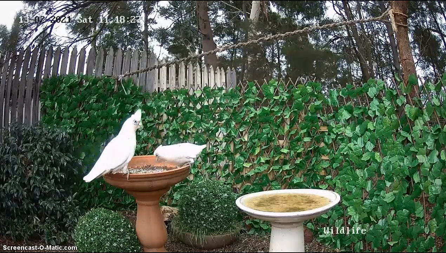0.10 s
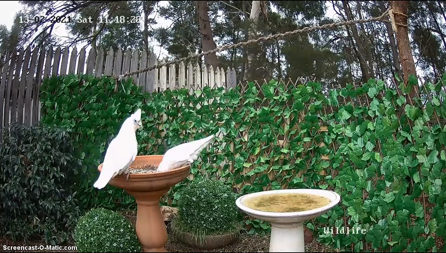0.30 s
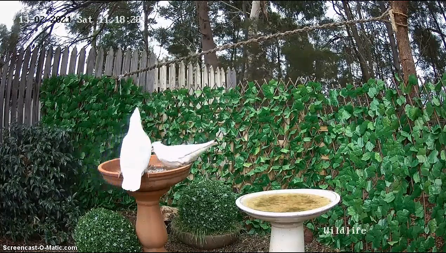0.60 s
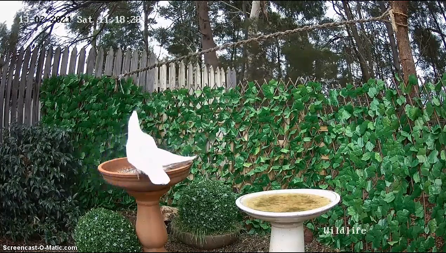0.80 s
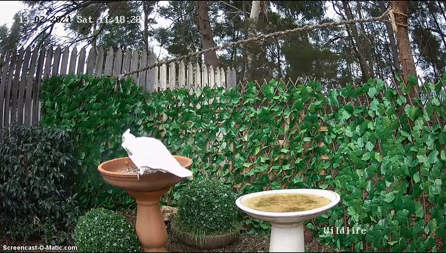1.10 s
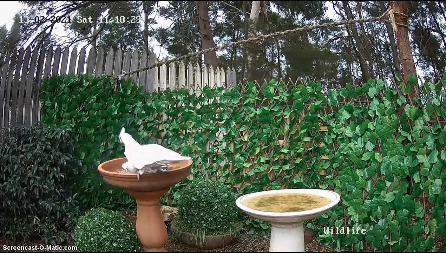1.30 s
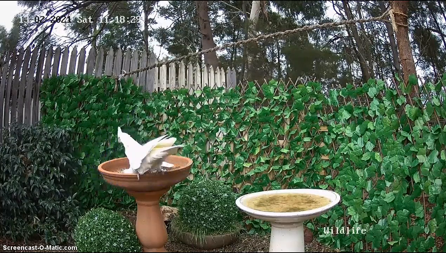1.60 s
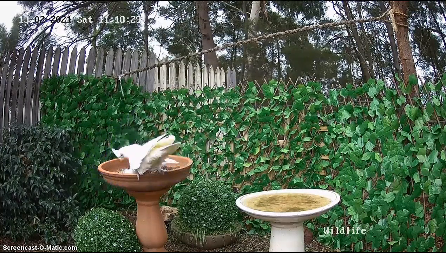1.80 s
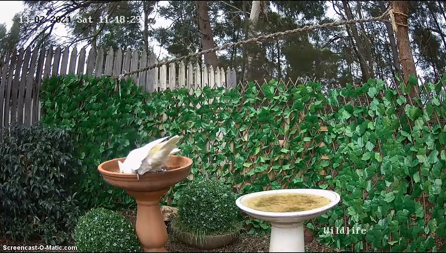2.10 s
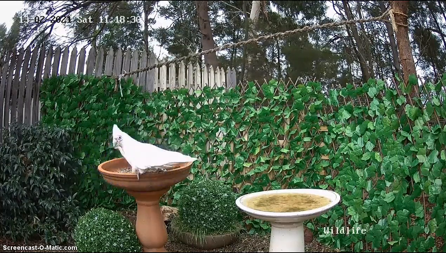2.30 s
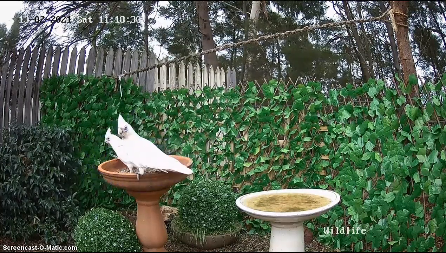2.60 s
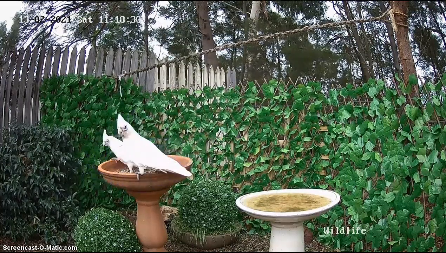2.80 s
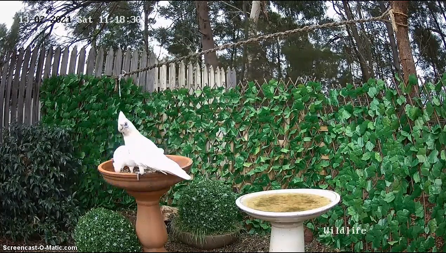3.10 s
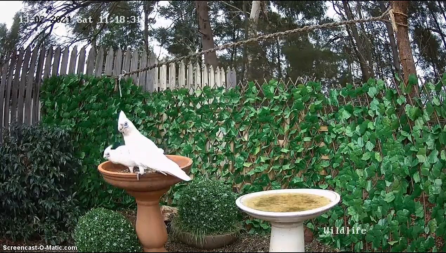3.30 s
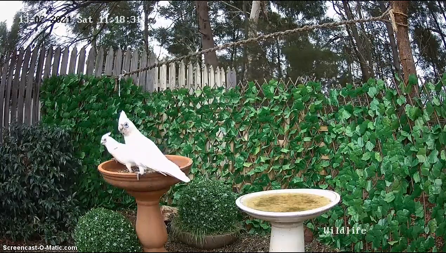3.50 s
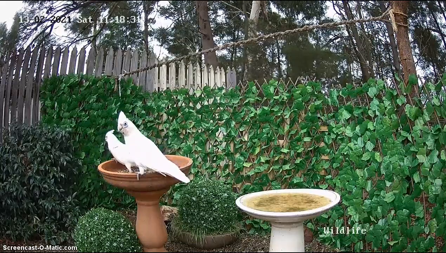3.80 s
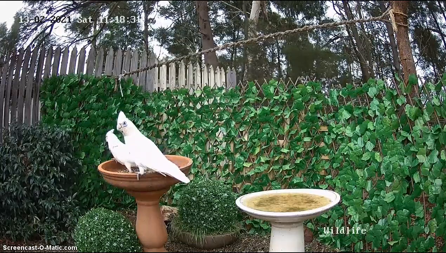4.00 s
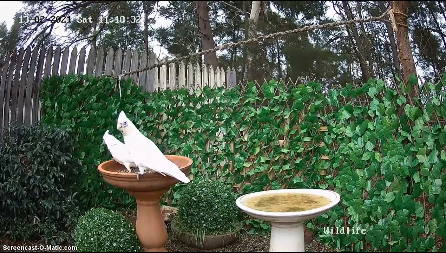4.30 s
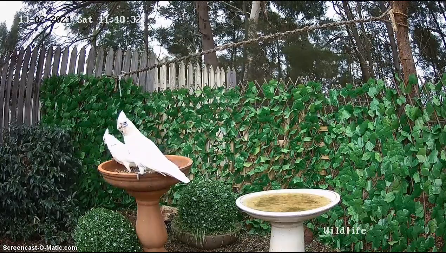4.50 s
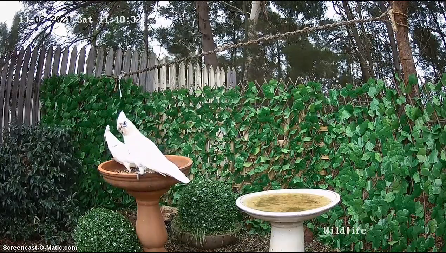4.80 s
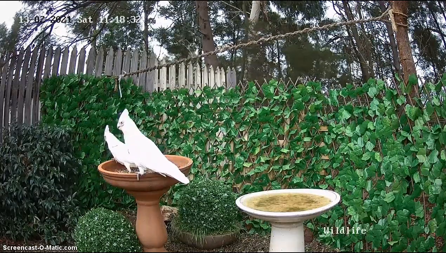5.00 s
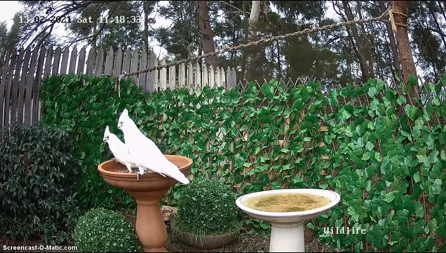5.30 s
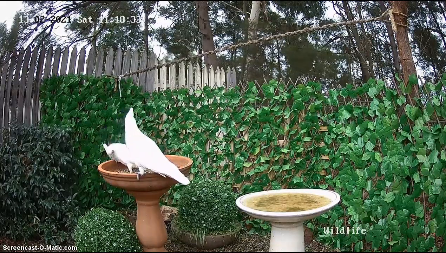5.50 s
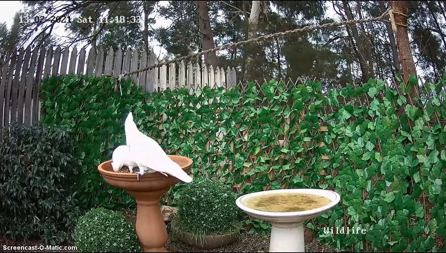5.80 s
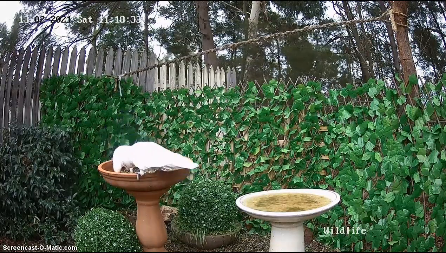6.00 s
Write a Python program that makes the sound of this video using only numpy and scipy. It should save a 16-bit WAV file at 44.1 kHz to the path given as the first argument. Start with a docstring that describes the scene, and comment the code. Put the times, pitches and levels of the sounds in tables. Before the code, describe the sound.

A cockatoo gives one loud, harsh screech in a garden, among short bird whistles, faint chirps, seed ticks and distant traffic hum.

```python
"""A garden on the edge of a town, a small camera microphone near the feeding bowl.
Close by, a white cockatoo screeches once: its syrinx swings evenly in a nasal tone, then slaps
chaotically into a rasp and ends in a squeal. Beaks tick in the seed and another bird whistles.
Small birds chirp further off in the trees; distant traffic drones over a low mains hum.
The camera hears it all through a narrow voice band and adds its own thin hiss."""
import sys
import numpy as np
from scipy import signal
from scipy.fft import rfft, irfft, next_fast_len
from scipy.io import wavfile
from scipy.ndimage import uniform_filter1d

SR = 44100
rng = np.random.default_rng(int(sys.argv[2]) if len(sys.argv) > 2 else 0)


def unload_wav(signal):
    """Save mono or channel-first audio to the path in sys.argv[1] as 16-bit WAV at rate SR, clipped to [-1, 1]."""
    wavfile.write(
        sys.argv[1],
        SR,
        np.round(np.clip(np.atleast_2d(signal).T, -1, 1) * 32767).astype(np.int16),
    )


N = 272979
TIME = np.arange(N) / SR
FFT_SIZE = next_fast_len(N + SR, real=True)
FREQ = np.arange(FFT_SIZE // 2 + 1) * SR / FFT_SIZE

# the screech, close to the microphone: t/s, f/Hz, level/dB, rasp over clean tone/dB
SCREECH_COURSE = [(2.066, 746, -48.5, 15.5), (2.087, 754.8, -37, 9), (2.11, 796.7, -30.5, 2),
                  (2.124, 794.2, -27, -12.5), (2.141, 794.4, -28.5, -16), (2.155, 780.6, -24, -13.5),
                  (2.188, 777.2, -21.5, -17.5), (2.212, 780.9, -24.2, -0.5), (2.265, 783, -25.5, 11.5),
                  (2.52, 782.2, -25.5, 13.5), (2.61, 774.5, -28.3, 28), (2.666, 768, -40, 30),
                  (2.697, 764, -66, 30)]
# harmonics of its clean tone, first to fifth: relative level/dB
NASAL_HARMONICS = [-7, -6.5, -0.5, -6.5, -7]
# throat resonances that colour the rasp: f/Hz, width/Hz, relative level/dB
THROAT_RESONANCES = [(330, 210, -20.5), (741, 74, -13), (1095, 25, -15.5), (1329, 40, -14.5),
                     (1605, 95, -13.5), (1806, 42, -14.5), (2333, 84, -6), (2593, 55, -9), (2913, 43, -9),
                     (3083, 65, -7), (3440, 30, -3), (3560, 80, -7), (3730, 45, -10), (3900, 35, -8),
                     (4150, 250, -13.5)]


def cockatoo(jitter=.0043, chaos=.3, scatter_db=3, flutter_db=.7, full_tone_s=2.147, thin_db=-10.5):
    """At the bowl: the syrinx swings evenly at first, then slaps chaotically and rings the throat."""
    gate, hz, level_db, rasp_db = controls(SCREECH_COURSE)
    rough = 1 / (1 + undb(-rasp_db))
    # the fundamental starts weak
    early = uniform_filter1d(1. * (TIME < full_tone_s), size=480)
    partials_db = [NASAL_HARMONICS[0] + thin_db * early, *NASAL_HARMONICS[1:]]
    # the tone stumbles as the rasp takes over
    clean = tone(hz * (1 + (jitter + .017 * rough) * walk(147)), partials_db)
    clean *= undb(4.6 * rough * (walk(70) - .3))
    cycles = np.floor(np.cumsum(hz * np.exp(chaos * walk(600))) / SR)
    slaps = np.diff(cycles, prepend=0) * undb(scatter_db * walk(550))
    slaps = unit(shape(slaps - slaps.mean(), 1 - .6 * bell(780, 220)))
    # uneven slaps and the air they let through drive the same resonances
    air = .66 * rng.standard_normal(N)
    peak_power = sum((undb(db) * bell(f, width)) ** 2 for f, width, db in THROAT_RESONANCES)
    throat = np.sqrt(peak_power + (undb(-25.5) * bell(2700, 1300)) ** 2)
    rasp = unit(shape(slaps + air, throat))
    # steady air pressure holds the strength of the rasp, which only flutters
    rasp /= np.sqrt(uniform_filter1d(rasp ** 2, size=700))
    rasp *= unit(undb(flutter_db * walk(130)))
    voice = ((1 - rough) * clean + rough * rasp) / np.hypot(1 - rough, rough)
    return gate * undb(level_db) * voice


def cockatoo_shrill(start_s=2.22, length_s=.3523, hz=3580, level_db=-29, jitter=.0095, flutter_db=2):
    """The other side of the syrinx holds a high unsteady tone through the rasp."""
    gain = undb(level_db) * envelope(start_s, length_s, attack_s=.037, release_s=.09)
    flutter = unit(undb(flutter_db * walk(110)))
    pitch = arc(start_s, length_s, hz, glide_hz=-10, arch_hz=10.5)
    return note(gain * flutter, pitch * (1 + jitter * walk(190)))


# the squeal that ends the screech and drops to a croak: t/s, f/Hz, level/dB
SQUEAL_COURSE = [(2.588, 1335, -38), (2.62, 1401, -37), (2.642, 1682, -38.5), (2.664, 1301, -38.5),
                 (2.685, 1155, -51.5), (2.714, 800, -51), (2.727, 490, -56), (2.742, 465, -44),
                 (2.78, 450, -52)]


def cockatoo_squeal(waver=.007, hoarse_waver=.05, hoarse_below_hz=1200):
    """The screech ends in a clear upturn, which grows hoarse as its pitch collapses."""
    gate, hz, db = controls(SQUEAL_COURSE)
    hoarse = uniform_filter1d(1. * (hz < hoarse_below_hz), size=600)
    tremble = 1 + (waver + hoarse_waver * hoarse) * walk(240)
    return note(gate * undb(db), hz * tremble, overtone_db=-20)


# soft nasal notes: t/s, length/s, f/Hz, glide/Hz, arch/Hz, flick/Hz, level/dB, swell/dB, overtone/dB
NASAL_NOTES = [(-.045, 0.14, 1429, -80, 104, 524, -44, 2, -11),
               (.566, .134, 1423, -1, 100, 230, -40.5, -3, -17),
               (2.839, .114, 1460, 40.5, 15, 259, -48.5, 9, -5.5),
               (5.574, 0.14, 1443, 20, 64, 170, -43, -2, -14)]
# the short note after each: t/s, length/s, f/Hz, glide/Hz, arch/Hz, level/dB, overtone/dB
ANSWER_NOTES = [(.107, 0.057, 1616, 40, 70, -35, -11.5), (.724, 0.045, 1528, -120, 21, -30, -29.5),
                (2.981, 0.039, 1638, 47, 3, -36.5, -14), (5.729, .048, 1553, -120, 30, -35, -30)]


def whistler(waver=.0073, flutter_db=.9, overtone_flutter_db=4.2, flick_s=.0253):
    """A bird nearby: a nasal note that flicks upward, then a short purer one; overtones come and go."""
    tremble = 1 + waver * walk(200)
    nasal_db = overtone_flutter_db * walk(65) - 1.5
    out = 0
    for start, length, hz, glide, arch, flick, db, swell_db, overtone_db in NASAL_NOTES:
        upturn = np.clip((TIME - start - length) / flick_s + 1, 0, 1)
        pitch = arc(start, length, hz, glide, arch) + flick * upturn
        gain = envelope(start, length, attack_s=.0082, release_s=.01)
        gain *= undb(db + swell_db * progress(start, length) / 2)
        out += note(gain, pitch * tremble, overtone_db + nasal_db - 5 * upturn, third_db=1)
    for start, length, hz, glide, arch, db, overtone_db in ANSWER_NOTES:
        gain = envelope(start, length, attack_s=.006, release_s=.017) * undb(db)
        out += note(gain, arc(start, length, hz, glide, arch) * tremble, overtone_db + nasal_db)
    return out * undb(flutter_db * walk(70))


# beaks on seed and bowl, close by: t/s, level/dB
SEED_CRACKS = [(.062, -46), (.759, -53), (.843, -51.5), (.854, -57), (1.026, -56), (2.994, -45),
               (3.026, -53), (3.385, -53), (3.836, -45), (4.127, -52), (5.174, -47), (5.461, -47),
               (5.475, -53), (5.8, -51.5)]
# their spectrum: f/Hz, relative level/dB
CRACK_SPECTRUM = [(300, -13), (1300, -3), (2200, 12.5), (3000, 10.5), (3800, 22), (4500, -15.5)]


def beaks(decay_s=.0036, rattle_s=.022, rattle_db=-11, nibble_db=-63, nibble_count=26):
    """Each crack of a seed is a sharp burst and a short rattle of husks; faint nibbles fall between."""
    nibbles = [(u * N / SR, nibble_db + 6 * v) for u, v in rng.random((nibble_count, 2))]
    age = TIME[:SR // 10]
    crack = np.exp(-age / decay_s) + undb(rattle_db) * np.exp(-age / rattle_s)
    bursts = np.zeros(2 * N)
    for s, db in list(SEED_CRACKS) + nibbles:
        start = int(s * SR)
        bursts[start:start + len(crack)] += undb(db) * crack
    return bursts[:N] * noise(colour(CRACK_SPECTRUM))


# high chirps in the trees: t/s, length/s, f/Hz, glide/Hz, arch/Hz, level/dB
TREE_CHIRPS = [(.502, 0.023, 3460, 0, 0, -59.5), (1.324, 0.025, 3440, 0, -60, -44.5),
               (1.468, 0.026, 3020, 80, 0, -48), (1.551, 0.015, 3700, -200, 0, -48.5),
               (1.566, 0.017, 3510, 2400, 200, -41.5), (1.587, .03, 3980, -550, 379, -30.5),
               (1.614, .022, 3420, 250, 350, -33), (1.635, .027, 2840, -900, 120, -38.5),
               (4.52, 0.027, 2700, -120, 0, -60), (4.847, 0.024, 2480, -480, 2, -56),
               (4.871, .025, 2600, -120, 0, -52), (5.227, 0.021, 2490, -480, 0, -56),
               (5.25, 0.024, 2450, -480, 0, -54), (5.27, 0.027, 2620, -200, -50, -51)]
# far slurred calls, timed by their drop in pitch: t/s, length before/s, length after/s, level/dB
FAR_SLURS = [(5.028, 0.0682, .037, -51), (5.436, .075, .08, -53), (6.137, .01, .08, -51.5)]


def small_birds(waver=.02, flutter_db=2.5, near_db=-35, echo_growth=.6, blur=.8):
    """Buzzy squeaks thickened by the leaves; the fainter ones are further off and have more echo."""
    tremble = 1 + waver * walk(450)
    flutter = unit(undb(flutter_db * walk(200)))
    calls = []
    for start, length, hz, glide, arch, db in TREE_CHIRPS + chatter():
        gain = envelope(start, length, attack_s=.008, release_s=.011)
        calls.append((db, gain, arc(start, length, hz, glide, arch)))
    calls += [(db, *slur(drop, before, after)) for drop, before, after, db in FAR_SLURS]
    direct, scattered = 0, 0
    for db, gain, hz in calls:
        call = undb(db) * note(gain, hz * tremble) * flutter
        direct += call
        scattered += call * undb(echo_growth * (near_db - db))
    leaves = garden_echo(direct, wet_db=-8.5, t60=.08, gap_s=.003)
    # the long echo is blurred in pitch
    trees = garden_echo(scattered * (1 + blur * walk(600)), wet_db=-21, t60=.8, ring=1)
    return undb(-1) * direct + leaves + trees


def slur(drop, before, after, high_hz=3410, low_hz=2200, sag_hz_per_s2=85000, drop_s=.013, low_db=-2.5):
    """Gain and pitch of a far call that sags to a held note, then falls to a softer low register."""
    high = np.exp(-np.clip(TIME - drop, 0, 1) / drop_s)
    upper_hz = high_hz + sag_hz_per_s2 * np.maximum(drop - TIME, 0) ** 2
    gain = envelope(drop - before, before + after, attack_s=.076, release_s=.025)
    return gain * undb(low_db * (1 - high)), high * upper_hz + (1 - high) * low_hz


def chatter(count=16, length_s=.02, low_hz=2600, high_hz=3900.5, glide_hz=-300, level_db=-66.5):
    """Rows of faint chirps deep in the trees, at chance times and pitches."""
    return [(u * N / SR, length_s, low_hz + v * (high_hz - low_hz), glide_hz, 0, level_db)
            for u, v in rng.random((count, 2))]


# bands that linger in the echo from the trees: f/Hz, width/Hz, lift/dB
LINGERING_BANDS = [(3000, 100, 7), (3460, 130, 8.5), (3900, 200, 2.5)]


def garden_echo(x, wet_db, t60, gap_s=.011, ring=0):
    """Fence, hedge and trees scatter a thin tail back to the microphone."""
    tail = rng.standard_normal(N) * undb(-60 * TIME / t60) * (TIME > gap_s)
    tail /= np.sqrt(np.sum(tail ** 2))
    lift = undb(ring * sum(db * bell(f, width) for f, width, db in LINGERING_BANDS))
    return undb(wet_db) * shape(x, lift * rfft(tail, FFT_SIZE))


# the distant town as heard from the garden: f/Hz, relative level/dB
TOWN_SPECTRUM = [(12, -44), (20, -1.5), (90, -5), (123, 2), (147, -5.5), (201, -2.5), (240, -10),
                 (306, -7.5), (426, -13), (466, -14), (532, -16), (621, -12), (1650, -22), (2060, -29.5),
                 (4000, -26), (5200, -62), (8800, -120)]
# its droning resonances: f/Hz, width/Hz, lift/dB
TOWN_DRONES = [(206.7, 10, 5), (471, 11.6, 9), (609.3, 10, 7), (767, 27, 4.5), (1714, 81, 7.5),
               (3000, 42, 4.5), (3540, 180, 0)]
# how it swells: t/s, mains hum level/dB, rumble level/dB, wash level before its lift/dB
TOWN_COURSE = [(0, -54.5, -50, -57), (1.0, -54, -51, -58.5), (1.7, -56.5, -52, -59),
               (2.4, -57.5, -52, -58.5), (3.4, -58.5, -51.5, -57), (4.4, -59.5, -50.5, -55.5),
               (5, -57.5, -51, -55.5), (6.19, -58.5, -49.5, -55.5)]


def town(mains_hum_hz=120, split_hz=400, wash_lift_db=1):
    """Distant traffic, a low rumble and a higher wash, drones and swells over a wavering mains hum."""
    _, hum_db, rumble_db, wash_db = controls(TOWN_COURSE)
    drones = undb(sum(db * bell(f, width) for f, width, db in TOWN_DRONES))
    spectrum = colour(TOWN_SPECTRUM) * drones
    bass = 1 / np.sqrt(1 + (FREQ / split_hz) ** 8)
    treble = np.sqrt(1 - bass ** 2)
    rumble = noise(spectrum * bass) * undb(rumble_db + .64 * walk(8))
    wash = noise(spectrum * treble) * undb(wash_db + wash_lift_db + .5 * walk(3.5))
    hum = tone(mains_hum_hz * (1 + .011 * walk(5.7))) * undb(hum_db + 1.8 * walk(9))
    return rumble + wash + hum


def far_rush():
    """Far off, a soft band of noise comes and goes once."""
    return noise(bell(hz=1780, width=300)) * swell(peak_s=5, half_s=.24, db=-62.5)


# the camera's own hiss: f/Hz, relative level/dB
HISS_SPECTRUM = [(200, 5.5), (5000, -2), (7500, -4.5), (10000, -6), (12500, -7), (15500, -9)]
# soft swells at the top of the hiss: t/s, half length/s, level/dB
TREBLE_SWELLS = [(1.648, .1, -68.5), (2.04, 0.09, -66), (2.48, 0.17, -66), (2.934, .05, -65),
                 (3.16, .06, -68.5), (3.41, .052, -64.5), (3.68, .05, -70.5), (3.883, .04, -66),
                 (4.12, .06, -65.5), (4.498, .18, -66.5)]


def camera_hiss(level_db=-64, top_hz=9750, lower_hz=6000, width_hz=2200):
    """Thin steady hiss whose treble swells now and then; one swell reaches lower."""
    top_gain = np.sqrt(sum(swell(*row) ** 2 for row in TREBLE_SWELLS))
    top = top_gain * noise(bell(top_hz, width_hz))
    steady = undb(level_db) * noise(colour(HISS_SPECTRUM))
    lower = swell(peak_s=4.5, half_s=.11, db=-65.5) * noise(bell(lower_hz, width_hz))
    return steady + top + lower


def tone(hz, partials_db=(0,)):
    """Harmonics on a moving pitch, at rms 1."""
    phase = 2 * np.pi * np.cumsum(hz) / SR
    return unit(sum(undb(db) * np.sin(k * phase) for k, db in enumerate(partials_db, 1)))


def note(gain, hz, overtone_db=-100, third_db=-9):
    """A gliding note; overtone_db sets its second harmonic, third_db the third against the second."""
    on = gain > 1e-6
    phase = 2 * np.pi * np.cumsum(hz[on]) / SR
    overtone_gain = undb(np.broadcast_to(overtone_db, N)[on])
    overtones = overtone_gain * (np.sin(2 * phase) + undb(third_db) * np.sin(3 * phase))
    out = np.zeros(N)
    out[on] = np.sqrt(2) * gain[on] * (np.sin(phase) + overtones)
    return out


def controls(rows):
    """A gate open from the first row's time to the last, then each further column at every sample."""
    s, *columns = np.transpose(rows)
    gate = uniform_filter1d(1. * ((TIME >= s[0]) & (TIME <= s[-1])), size=128)
    return [gate] + [np.interp(TIME, s, column) for column in columns]


def envelope(start, length, attack_s, release_s):
    """Attack, hold and release."""
    return np.clip((TIME - start) / attack_s, 0, 1) * np.clip((start + length - TIME) / release_s, 0, 1)


def progress(start, length):
    """Runs from -1 to 1 in the course of a note."""
    return np.clip(2 * (TIME - start) / length - 1, -1, 1)


def arc(start, length, hz, glide_hz, arch_hz):
    """The pitch of a note glides and arches over its middle."""
    u = progress(start, length)
    return hz + glide_hz * u / 2 - arch_hz * u ** 2


def swell(peak_s, half_s, db):
    """A smooth rise and fall of gain."""
    return undb(db) * np.exp(-((TIME - peak_s) / half_s) ** 2 / 2)


def noise(gain):
    """Coloured noise of rms 1."""
    return unit(shape(rng.standard_normal(N), gain))


def walk(rate_hz):
    """Smooth random wander of spread 1."""
    return noise(np.exp(-(FREQ / rate_hz) ** 2))


def shape(x, gain):
    """Filter by a gain for each frequency."""
    return irfft(rfft(x, FFT_SIZE) * gain, FFT_SIZE)[:N]


def colour(points):
    """Gain for each frequency from points of f/Hz, level/dB."""
    hz, db = np.transpose(points)
    return undb(np.interp(np.log(FREQ + 1), np.log(hz), db))


def bell(hz, width):
    """A resonance applied twice, for steep flanks."""
    return 1 / (1 + ((FREQ - hz) / width) ** 2)


def undb(db):
    """Decibels to gain."""
    return 10 ** (np.asarray(db) / 20)


def unit(x):
    """Scale to rms 1."""
    return x / np.sqrt(np.mean(x ** 2))


def scene():
    """What reaches the microphone: near birds at the bowl, small ones in the trees, the town beyond."""
    bowl = cockatoo() + cockatoo_shrill() + cockatoo_squeal() + beaks()
    whistles = whistler()
    bowl += garden_echo(bowl, wet_db=-15.5, t60=.68)
    whistles += garden_echo(whistles, wet_db=-21.5, t60=.56)
    return (bowl + whistles + small_birds() + town() + far_rush())[None]


# upper edge of the camera's voice band: f/Hz, level/dB
VOICE_BAND_EDGE = [(3650, 0), (4000, -4), (4300, -13), (4450, -27), (4600, -62), (5000, -100)]


def record(dry, sampling_hz=8000, top_hz=15750):
    """Mono camera microphone: slow sampling mirrors sound about the band's edge; hiss lies on top."""
    band = colour(VOICE_BAND_EDGE)
    mirrored = shape(dry[0], band) * (1 + 2 * np.cos(2 * np.pi * sampling_hz * TIME))
    with_hiss = shape(mirrored, band) + camera_hiss()
    lowpass = signal.ellip(10, .2, 70, top_hz, fs=SR, output="sos")
    return signal.sosfilt(lowpass, with_hiss)[None]


dry = scene()
out = record(dry)
unload_wav(out)
```